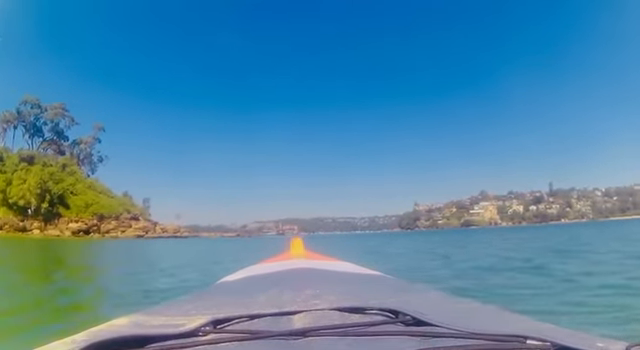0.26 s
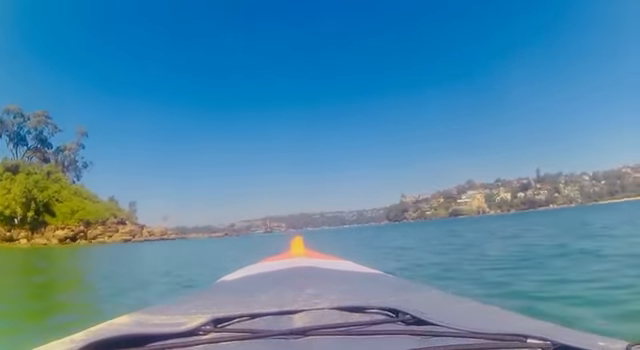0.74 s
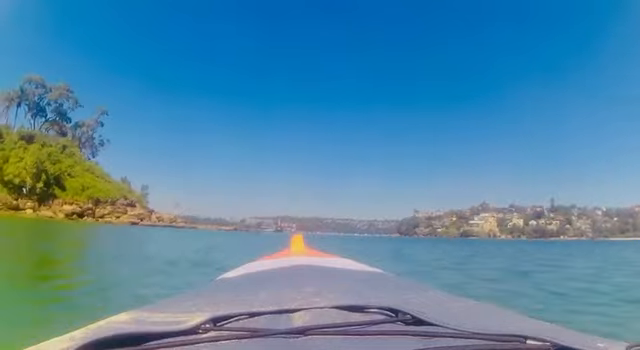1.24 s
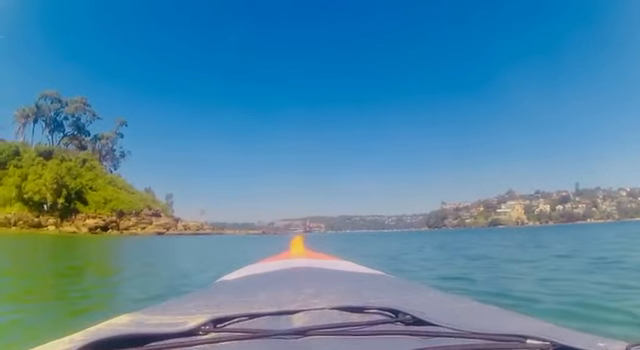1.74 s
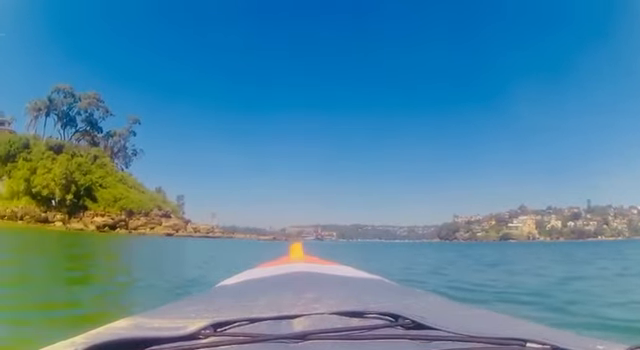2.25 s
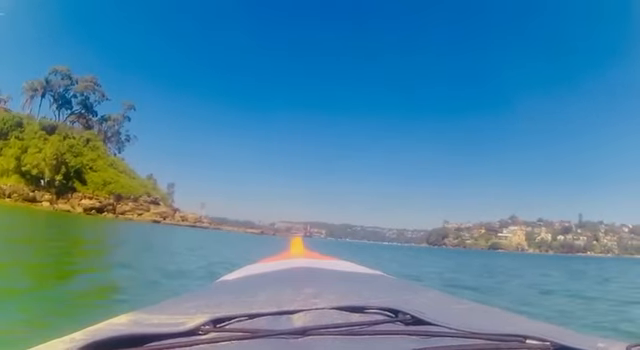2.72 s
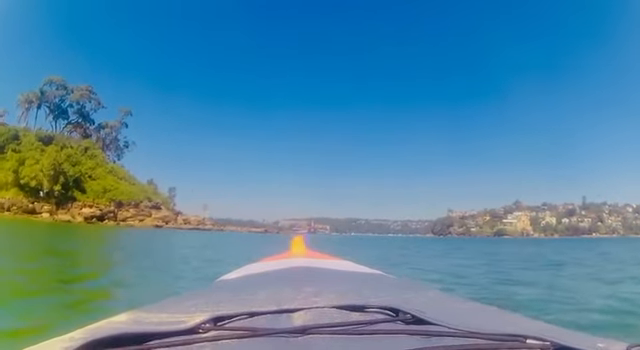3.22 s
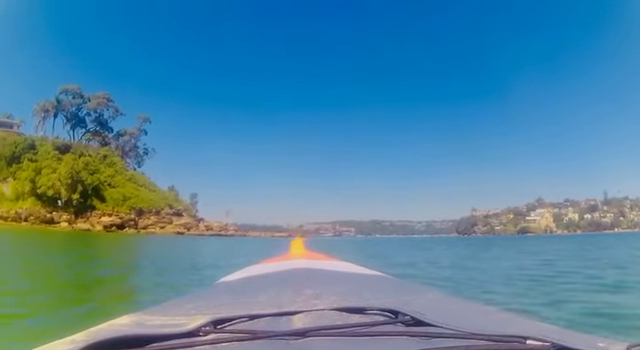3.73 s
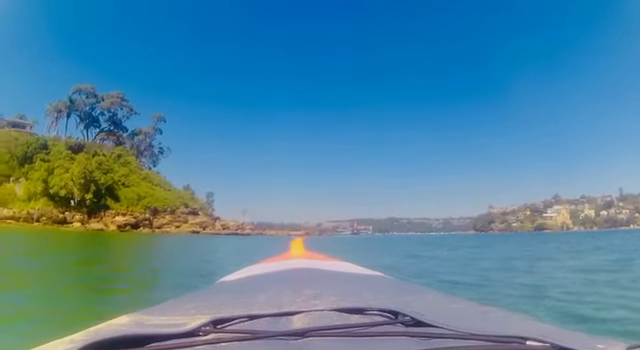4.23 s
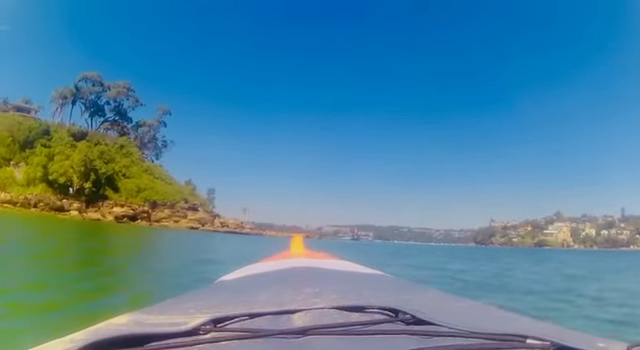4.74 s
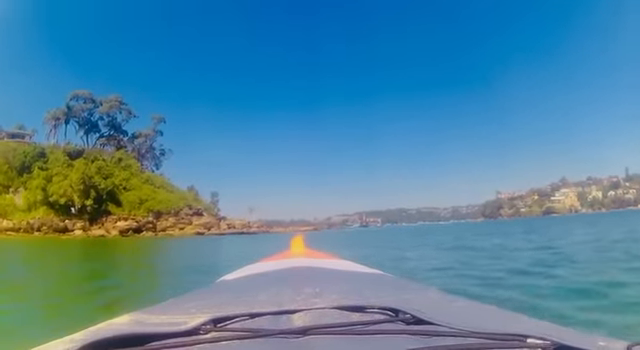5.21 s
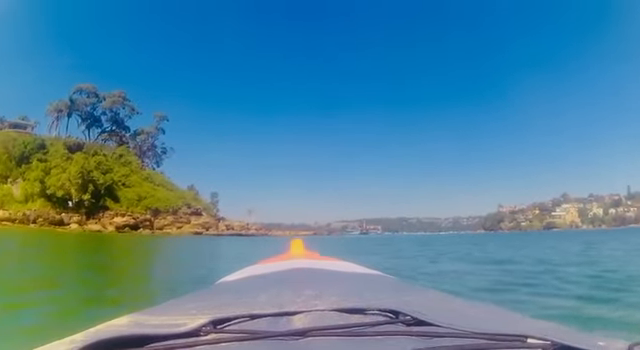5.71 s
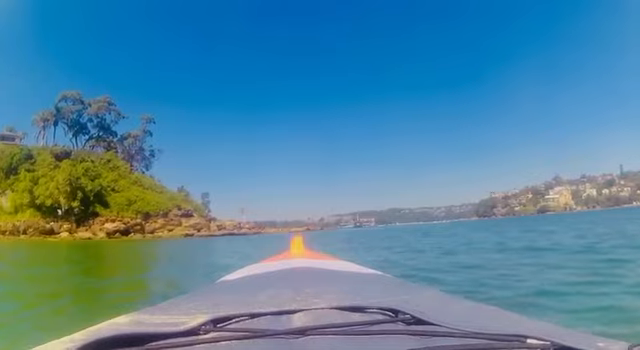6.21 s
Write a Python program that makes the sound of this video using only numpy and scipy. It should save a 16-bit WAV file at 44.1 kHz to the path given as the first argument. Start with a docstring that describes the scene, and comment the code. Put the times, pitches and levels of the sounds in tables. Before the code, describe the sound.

A kayak glides over calm water, heard close from its deck. About once a second a paddle blade slaps in with a hollow plop and a light thud, followed by bubbling swirls and small drips. Near the middle the paddle knocks once, hard, on the hull. A soft rumble of air and water and a faint, thin, warbling electronic whine continue underneath.

```python
"""A soft rumble, ripples at the bow and a thin, warbling electronic whine: a kayak glides over calm
water, heard from its deck. Drops and fine spray fall off the raised paddle. Each blade slaps in and
opens an air pocket whose note falls as it grows; the hull rings and thuds, and water swirls round
the blade in a mass of bubbles. Near the middle the paddle knocks once, hard, on the hull."""
import sys
import numpy as np
from scipy import signal
from scipy.fft import rfft, irfft, next_fast_len
from scipy.io import wavfile
from scipy.ndimage import uniform_filter1d

SR = 44100
rng = np.random.default_rng(int(sys.argv[2]) if len(sys.argv) > 2 else 0)


def inscribe(sig):
    """Save sig as 16-bit PCM at rate SR to the path in sys.argv[1].

    A 1-D sig is mono; a 2-D sig holds one channel per row.
    Samples are clipped to [-1, 1] before scaling.
    """
    pcm = np.round(np.clip(np.atleast_2d(sig).T, -1, 1) * 32767)
    wavfile.write(sys.argv[1], SR, pcm.astype(np.int16))


N = 284886

# air and water along the hull: (frequency [Hz], relative level [dB])
RUMBLE_COLOUR = [(12, -52.5), (20, 0), (64, 1), (87, -2), (139, -4), (228, -8.5), (265, -9), (332, -10.5),
                 (1070, -19.5), (1240, -21), (1440, -23), (1940, -22.5), (3520, -29.5), (4190, -30),
                 (7600, -30.5), (9880, -42.5), (16700, -120)]
# small bubbles at the bow: (frequency [Hz], relative level [dB])
RIPPLE_COLOUR = [(1150, 3), (1300, 5), (1550, -6), (1900, 6.5), (2500, -3), (3200, -11.5), (4300, -4),
                 (5200, -13)]
# warbling tones of the electronics: (centre [Hz], level [dB], swing [Hz], jitter [Hz])
WARBLE_TONES = [(9127, -63, 116, 190), (8854, -64.5, 152, 370)]
# steady tones of the electronics: (pitch [Hz], level [dB])
STEADY_TONES = [(8830, -74), (8905, -74)]
# lulls in the warble, about three a second: (start [s])
LULL_STARTS = [0.144, 0.476, 0.852, 1.177, 1.45, 1.85, 2.15, 2.46, 2.5, 2.887, 3.186, 3.5, 3.89, 4.186,
               4.49, 4.876, 5.156, 5.425, 5.757, 5.995, 6.295]
# faint hiss heard in the lulls: (frequency [Hz], relative level [dB])
HISS_COLOUR = [(8300, -10), (8800, -20), (9300, 9), (9700, -3.5), (11000, 1.5), (11900, -11.5)]
# the blade drags through the water; brightness trades gurgle and push for spray:
# (time [s], length [s], first level [dB], last level [dB], brightness [dB])
BLADE_PULLS = [(0.931, 0.35, -60, -57, -3), (2.198, 0.11, -61, -65, -4.5), (3.086, .12, -51, -50, 2),
               (3.219, .19, -59.5, -54, 0), (4.263, .11, -53, -60, -1), (4.578, 0.054, -65, -56.5, 12),
               (5.574, 0.21, -55, -69.5, -4)]
# water trickles off the raised blade as fine spray: (time [s], length [s], level [dB])
BLADE_TRICKLES = [(0.36, 0.83, -75.5), (2.52, .06, -73), (5.884, .25, -70)]
# low push of stirred water on the hull: (frequency [Hz], relative level [dB])
HULL_PUSH_COLOUR = [(20, -5), (45, -1), (100, -3.5), (170, -17.5), (400, -54)]
# big gurgling bubbles: (frequency [Hz], relative level [dB])
BIG_BUBBLE_COLOUR = [(130, 0.5), (220, 2), (380, 3), (520, -1.5), (680, -10), (900, -8.5)]
# tiny bubbles of spray: (frequency [Hz], relative level [dB])
FINE_BUBBLE_COLOUR = [(2200, 18.5), (2700, 12.7), (3300, 13), (4300, 16.4), (6000, 4.7)]
# resonances of the deck under splashing water: (pitch [Hz], relative level [dB], t60 [s])
DECK_MODES = [(705, -8.5, 0.031), (1229, 0, 0.029), (1346, -1, 0.015), (1610, -1.5, 0.014),
              (1880, 1, 0.011), (2020, -4.5, 0.0092)]
# the loudest drops off the blade: (time [s], level [dB], pitch [Hz])
BLADE_DROPS = [(0.229, -51, 1800), (0.306, -54.5, 1860), (0.359, -54.5, 1850), (0.383, -51.5, 3100),
               (0.641, -55, 1740), (0.825, -49, 1850), (1.138, -44, 1600), (1.206, -40.5, 1260),
               (1.449, -53, 2100), (2.013, -49, 4330), (2.242, -46, 1990), (3.408, -42, 1270),
               (3.438, -46.5, 1210), (4.054, -52, 2230), (4.356, -45.5, 1820), (4.600, -48.5, 1220),
               (4.727, -50.5, 1640), (5.620, -44, 1890)]
# air pockets opened by the blade:
# (time [s], level [dB], first pitch [Hz], growth of the radius [m/s], length [s])
AIR_POCKETS = [(0.8962, -29.5, 694, .42, 0.013), (1.235, -40.5, 302, 0.48, 0.022),
               (1.2878, -42, 1200, 0.14, .005), (1.290, -42.5, 361, 0.71, 0.093),
               (2.103, -35.5, 515, 0.46, 0.018), (2.1062, -33, 1310, 0.11, .009),
               (2.206, -27.5, 338, 0.015, 0.0034), (3.036, -28, 480, 0.46, 0.014),
               (4.166, -36.5, 788, 0.53, .023), (4.389, -37, 248, 1.22, 0.048),
               (4.899, -41.5, 425, 0.61, 0.027), (5.4535, -27, 563.6, -.15, 0.013),
               (5.456, -30, 259, 0.27, .012), (5.832, -38, 112, 1.25, 0.073)]
# slaps of the blade on the surface:
# (time [s], splash [dB], fade [s], hull ring [dB], thump [dB], surge [dB])
BLADE_SLAPS = [(0.8967, -36.5, 0.011, -43.5, -31, -37), (1.2853, -41.5, 0.004, -64, -42, -58),
               (2.1035, -33.5, 0.016, -40.5, -27.5, -37.5), (2.2036, -48, 0.024, -50, -36, -52),
               (2.9102, -30.5, 0.011, -31.5, -20.5, -46), (3.0369, -30, 0.0039, -41.5, -25, -46),
               (4.1670, -30, 0.016, -41, -41, -47.5), (5.4535, -31.5, 0.0077, -39, -27.5, -38)]
# burst of breaking water: (frequency [Hz], relative level [dB])
BURST_COLOUR = [(100, 10.5), (400, -14.5), (800, 1), (1050, -11.5), (1400, -3.5), (2000, -14.5),
                (2600, -20.5), (3500, -23), (5000, -33), (8000, -36)]
# ring of paddle shaft and hull: (pitch [Hz], relative level [dB], t60 [s])
HULL_MODES = [(182, -23, .1), (408, 0, 0.071), (645, -21, 0.33), (665, -2.5, 0.18), (793, 4, 0.05),
              (1210, -41, .11), (1470, -34, 0.1), (1838, -7.5, 0.064), (1990, -25, .08), (3246, -18, 0.095),
              (4600, -62, .05)]
# the blade's broad, heavily damped thump: (pitch [Hz], relative level [dB], t60 [s])
THUMP_MODES = [(104, -21, 0.047), (204, 2, 0.018), (451, -2, 0.046), (1150, -15, 0.0035)]
# crack of the paddle on the hull: (pitch [Hz], relative level [dB], t60 [s])
CRACK_MODES = [(1800, -2.5, 0.0084), (3530, -1.5, 0.004), (5600, -3.5, 0.0015)]


def from_db(db):
    """Decibels to gain."""
    return 10 ** (np.asarray(db) / 20)


def rms_one(x):
    """Scale to unit power."""
    return x / np.sqrt(np.mean(x ** 2) + 1e-20)


def at_hz(colour, hz):
    """Read a colour's level in dB on a log-frequency axis."""
    f, db = np.transpose(colour)
    return np.interp(np.log(hz + 1e-6), np.log(f), db)


def noise(colour):
    """Steady noise of a given colour, rms 1."""
    size = next_fast_len(N)
    gain = from_db(at_hz(colour, np.fft.rfftfreq(size, 1 / SR)))
    return rms_one(irfft(rfft(rng.standard_normal(size)) * gain, size)[:N])


def drift(per_s):
    """A random wander with a spread near 1."""
    knots = rng.standard_normal(N // 8)
    return np.interp(np.arange(N) / SR * per_s, np.arange(len(knots)), knots)


def sine(hz):
    """A sine that follows a pitch track."""
    return np.sin(2 * np.pi * np.cumsum(hz) / SR)


def ring(clicks, hz, t60):
    """A unit click sets a sine of height 1 ringing."""
    r, w = from_db(-60 / (t60 * SR)), 2 * np.pi * hz / SR
    return signal.lfilter([0, np.sin(w)], [1, -2 * r * np.cos(w), r * r], clicks + 1e-18)


def struck(blows, modes):
    """Blows ring a body's modes, neighbours in opposite phase."""
    return sum((-1) ** k * from_db(db) * ring(blows, hz, t60) for k, (hz, db, t60) in enumerate(modes))


def event_time():
    """Seconds since the start of a short event."""
    return np.arange(SR // 2) / SR


def add(out, start, sound):
    """Mix a sound in at a time in seconds."""
    at = max(round(start * SR), 0)
    out[at:at + len(sound)] += sound[:len(out) - at]


def throb(hz, swell_s, fade_s):
    """A note along a pitch track that swells, then dies."""
    t = event_time()
    rise = np.sin(np.pi / 2 * np.minimum(t / swell_s, 1))
    fall = np.exp(-(np.maximum(t - swell_s, 0) / fade_s) ** 0.99)
    return -rise * fall * sine(hz)


def flow(start, hold_s, attack_s=0.0074, release_s=0.014):
    """Envelope of moving water: rises from start, stays up until start + hold_s, then dies away."""
    t = np.arange(N) / SR - start
    return np.clip(t / attack_s, 0, 1) * np.exp(-np.maximum(t - hold_s, 0) / release_s)


def patter(per_s, spread_db):
    """Clicks at random times, most small and a few big."""
    sizes = from_db(spread_db * np.minimum(rng.exponential(1, N), 4)) * rng.choice([-1, 1], N)
    return sizes * (rng.random(N) < per_s / SR)


def bubbles(colour, per_s, cycles, spread_db, pitch_count):
    """Bubbles born at random, each ringing some cycles at one of many pitches; rms 1."""
    births = patter(per_s, spread_db)
    slot = rng.integers(0, pitch_count, N)
    pitches = np.geomspace(colour[0][0], colour[-1][0], pitch_count)
    return rms_one(sum(from_db(at_hz(colour, hz)) * np.sqrt(hz) * ring(births * (slot == k), hz, cycles / hz)
                       for k, hz in enumerate(pitches)))


def rumble(level_db=-55.5, waver_db=1.2, top_hz=9200):
    """A soft bed of air and water washing along the gliding hull."""
    wash = signal.sosfilt(signal.butter(16, top_hz, fs=SR, output="sos"), noise(RUMBLE_COLOUR))
    return from_db(level_db + waver_db * drift(14)) * wash


def ripples(level_db=-75):
    """Small bubbles trickle along the bow."""
    return from_db(level_db) * bubbles(RIPPLE_COLOUR, per_s=220, cycles=52, spread_db=4.5, pitch_count=18)


def whine(load_hz=29.97, band_hz=(7800, 9450), lull_s=0.042, hiss_db=-70):
    """A thin electronic whine: steady tones under a warble that pauses about three times a second.
    A faint, wide hiss is heard in each pause."""
    t = np.arange(N) / SR
    in_lull = np.any([(t > start) & (t < start + lull_s) for start in LULL_STARTS], axis=0)
    lull = uniform_filter1d(in_lull.astype(float), size=130)
    load = -np.sin(2 * np.pi * load_hz * t + np.pi / 6)
    warble = sum(from_db(db) * rms_one(sine(hz + swing * load + 2 * jitter * np.tanh(drift(520) / 2)))
                 for hz, db, swing, jitter in WARBLE_TONES)
    warble = signal.sosfilt(signal.butter(6, band_hz, "band", fs=SR, output="sos"), (1 - lull) * warble)
    steady = sum(from_db(db) * rms_one(sine(hz + 5 * drift(23))) for hz, db in STEADY_TONES)
    hiss = uniform_filter1d(lull, size=1400) * from_db(hiss_db) * noise(HISS_COLOUR)
    return warble + steady + hiss


def stirrings(churn_db=-17, churn_s=0.023, churn_bright_db=-2):
    """Each pull, and the churn after each slap, stirs the water: (envelope [gain], brightness [dB])."""
    t, stirs = np.arange(N) / SR, []
    for start, length, first_db, last_db, bright_db in BLADE_PULLS:
        ramp = from_db(np.interp(t, [start, start + length], [first_db, last_db]))
        stirs.append((ramp * flow(start, length), bright_db))
    for start, splash_db, *_ in BLADE_SLAPS:
        churn = flow(start, churn_s, attack_s=churn_s, release_s=churn_s)
        stirs.append((from_db(splash_db + churn_db) * churn, churn_bright_db))
    return stirs


def splashing():
    """A dense patter of collapsing bubbles rings the deck; rms 1."""
    return rms_one(struck(patter(per_s=2500, spread_db=4), DECK_MODES))


def swirl(uneven_db=2.56, push_db=1.5, gurgle_db=1, spray_db=-15.5,
          bow_gurgle_db=-68.5, bow_splash_db=-72.5, bow_spray_db=-76.5):
    """Stirred water pushes on the hull and makes a deep gurgle, a splashing wash and fine spray."""
    stirs, uneven = stirrings(), from_db(uneven_db * drift(30))
    low, mid, high = (uneven * sum(gain * from_db(tilt * bright_db) for gain, bright_db in stirs)
                      for tilt in (-1, 0, 1))
    trickle = sum(from_db(db) * flow(start, length) for start, length, db in BLADE_TRICKLES)
    push = from_db(push_db) * low * noise(HULL_PUSH_COLOUR)
    gurgle = bubbles(BIG_BUBBLE_COLOUR, per_s=700, cycles=7.2, spread_db=2.5, pitch_count=16)
    splash = splashing()
    spray = bubbles(FINE_BUBBLE_COLOUR, per_s=500, cycles=55, spread_db=1.0, pitch_count=18)
    # the bow wave keeps these three layers alive between strokes
    gurgle *= np.hypot(from_db(gurgle_db) * low, from_db(bow_gurgle_db))
    splash *= np.hypot(mid, from_db(bow_splash_db))
    spray *= np.hypot(from_db(spray_db) * high + trickle, from_db(bow_spray_db))
    return push + gurgle + splash + spray


def stray_drops(count=22, level_db=-54, spread_db=2, low_hz=1310, high_hz=3190):
    """Faint drops fall at random: (time [s], level [dB], pitch [Hz])."""
    when, size, pitch = rng.random((count, 3)).T
    db = level_db + spread_db * (2 * size - 1)
    hz = low_hz * (high_hz / low_hz) ** pitch
    return list(zip(when * N / SR, db, hz))


def drops(cycles=61, rise=0.14, tick_db=-7, tick_s=0.0086, attack_s=0.00025):
    """Each drop ticks on the surface and leaves a bubble that bends up in pitch; low ones ring longer."""
    out, t = np.zeros(N), event_time()
    for start, db, hz in list(BLADE_DROPS) + stray_drops():
        t60 = cycles / hz
        note = sine(hz * (1 + rise * np.minimum(t / t60, 1))) * from_db(-60 * t / t60)
        tick = rms_one(ring(rng.standard_normal(len(t)), hz, 4 / hz)) * np.exp(-t / tick_s)
        add(out, start, from_db(db) * (note + from_db(tick_db) * tick) * (1 - np.exp(-t / attack_s)))
    return out


def pockets(bubble_hz_m=3.26, swell_share=0.64, wobble=0.2, rough_db=4.0, breakup_s=0.0053):
    """Trapped air rings at a pitch inverse to its changing radius, and roughens as it breaks up."""
    out, t = np.zeros(N), event_time()
    broken = 1 - np.exp(-(t / breakup_s) ** 2)
    for start, db, first_hz, growth, length in AIR_POCKETS:
        first_radius = bubble_hz_m / first_hz
        radius = np.maximum(first_radius + growth * t, first_radius / 2)
        hz = bubble_hz_m / radius * (1 + wobble * broken * drift(232)[:len(t)])
        gain = from_db(db + rough_db * broken * drift(458)[:len(t)])
        swell_s = length * swell_share
        add(out, start, gain * throb(hz, swell_s, length - swell_s))
    return out


def slaps(attack_s=0.000932):
    """Water bursts at each entry; the blow thumps the blade and sets shaft and hull ringing."""
    out, blows, thumps, t = np.zeros(N), np.zeros(N), np.zeros(N), event_time()
    burst = noise(BURST_COLOUR)
    for start, splash_db, fade_s, ring_db, thump_db, _ in BLADE_SLAPS:
        at = round(start * SR)
        envelope = (1 - np.exp(-t / attack_s)) * np.exp(-np.maximum(t - 2 * attack_s, 0) / fade_s)
        add(out, start, from_db(splash_db) * burst[at:at + len(t)] * envelope)
        add(blows, start + attack_s, from_db([ring_db]))
        add(thumps, start + attack_s, from_db([thump_db]))
    return out + struck(blows, HULL_MODES) + struck(thumps, THUMP_MODES)


def surges(centre_hz=68.2, sag=0.27, sag_s=0.039, wobble=0.28):
    """After each slap the pushed water thuds on the hull, sinking unevenly in pitch."""
    out, t = np.zeros(N), event_time()
    for start, *_, db in BLADE_SLAPS:
        hz = centre_hz * (1 + sag * (2 * np.exp(-t / sag_s) - 1) + wobble * drift(51)[:len(t)])
        add(out, start, from_db(db) * throb(hz, swell_s=0.032, fade_s=0.078))
    return out


def knock(start=2.9105, note_db=-12, centre_hz=526, sag=0.079, sag_s=0.0043,
          grit_db=-41.5, grit_delay_s=0.00117, grit_s=0.0066):
    """The paddle hits the hull: a short hollow note that sinks a little, and a bright gritty crack."""
    note, grit, t = np.zeros(N), np.zeros(N), event_time()
    hz = centre_hz * (1 + sag * (2 * np.exp(-t / sag_s) - 1))
    add(note, start, from_db(note_db) * throb(hz, swell_s=0.00464, fade_s=0.001))
    contact = np.sin(np.pi * np.minimum(t / grit_s, 1))
    add(grit, start + grit_delay_s, from_db(grit_db) * rng.uniform(-1.2, 1, len(t)) * contact)
    return note + struck(grit, CRACK_MODES)


def scene(housing_hz=6200):
    """Paddle and water, dulled by the microphone's waterproof housing, over rumble and whine."""
    water = pockets() + slaps() + knock() + surges() + drops() + swirl() + ripples()
    water = signal.sosfilt(signal.butter(4, housing_hz, fs=SR, output="sos"), water)
    return (water + rumble() + whine())[None]


def record(dry):
    """A steep high cut at 11.7 kHz takes off the top."""
    return signal.sosfilt(signal.ellip(10, .1, 80, 11700, fs=SR, output="sos"), dry)


dry = scene()
out = record(dry)
inscribe(out)
```